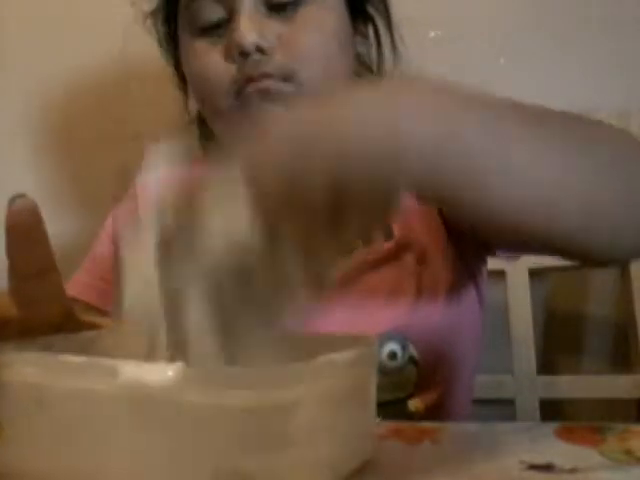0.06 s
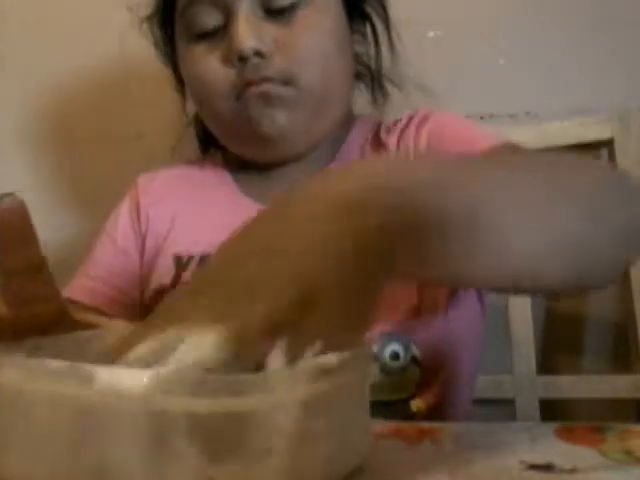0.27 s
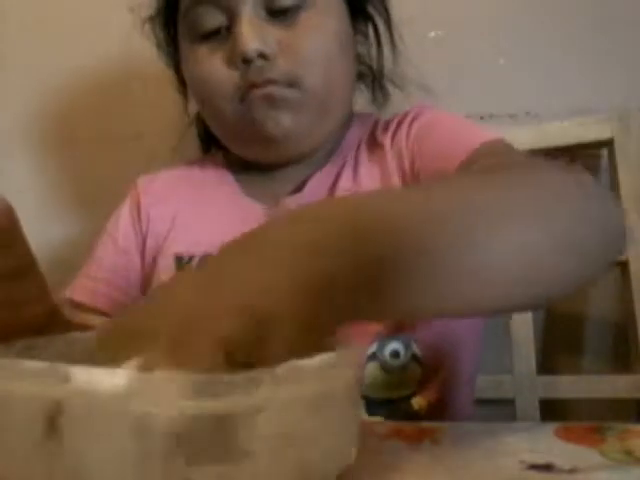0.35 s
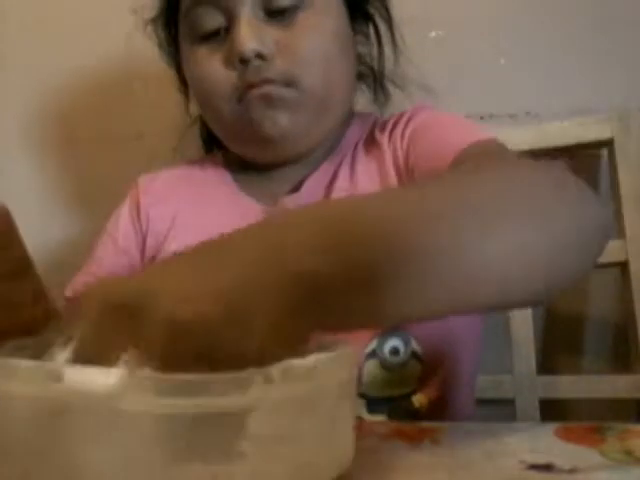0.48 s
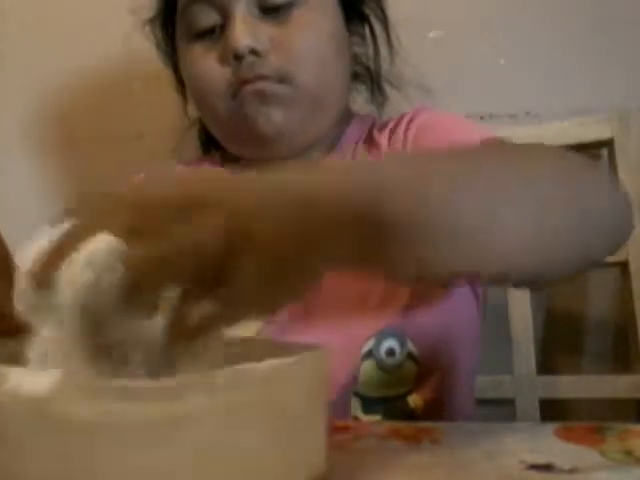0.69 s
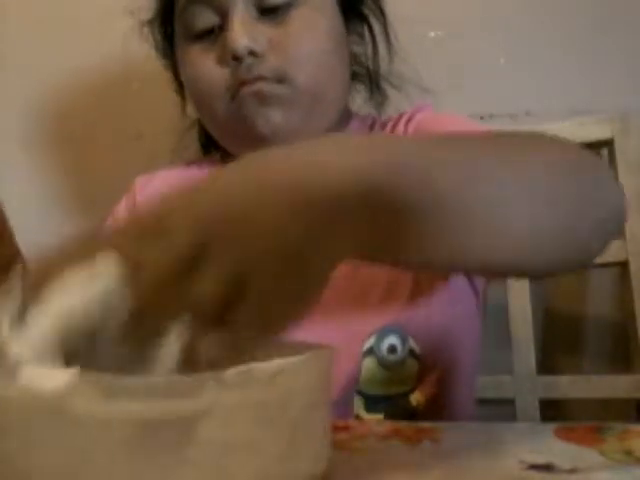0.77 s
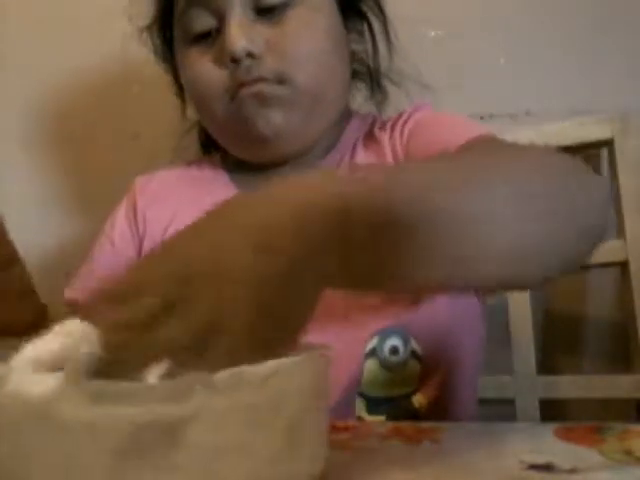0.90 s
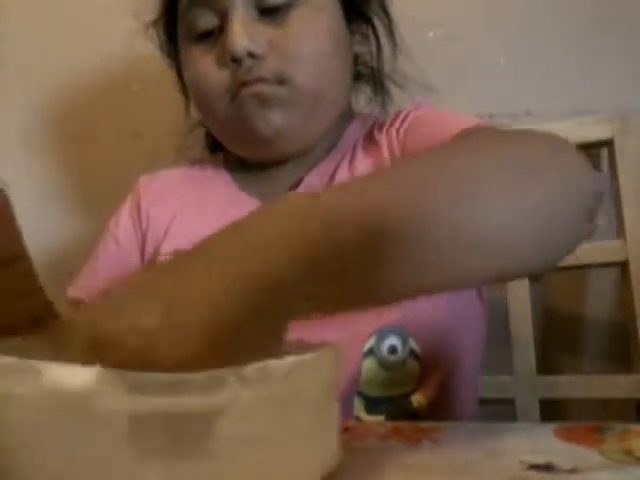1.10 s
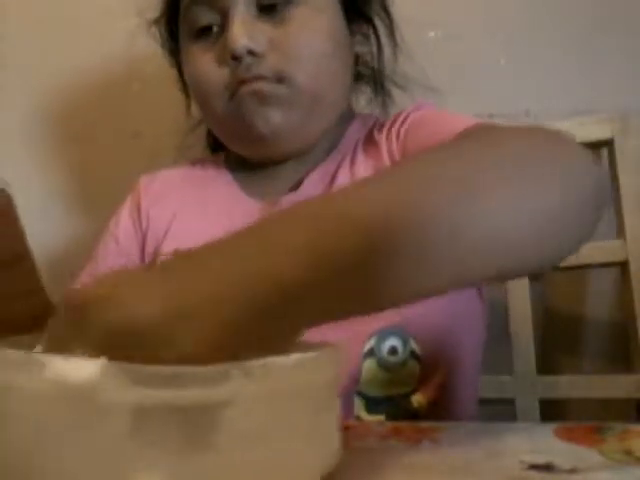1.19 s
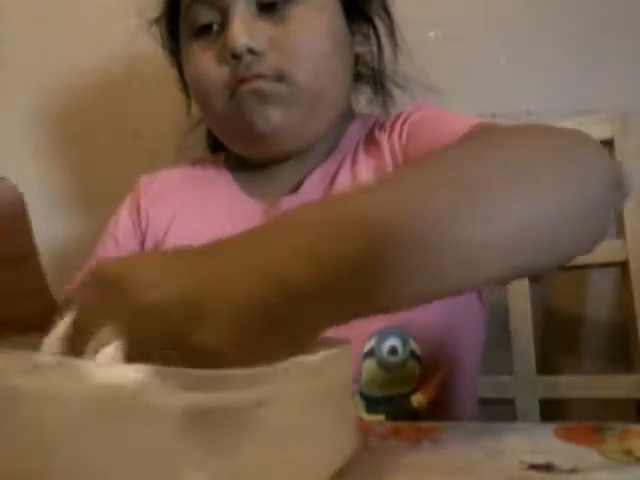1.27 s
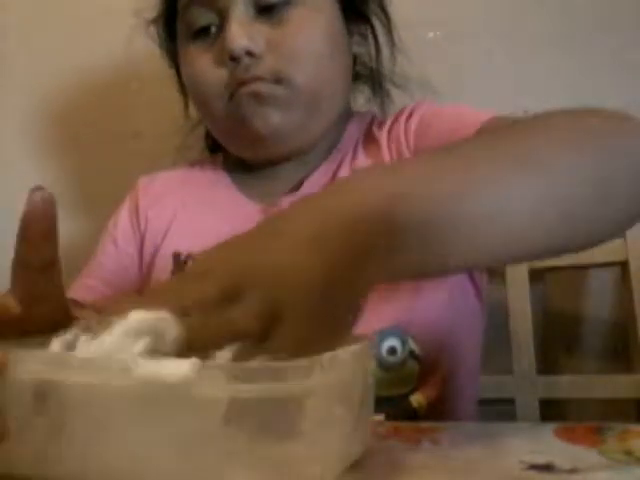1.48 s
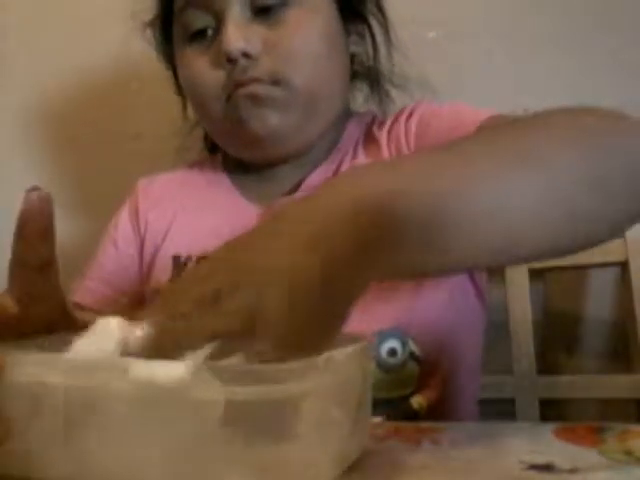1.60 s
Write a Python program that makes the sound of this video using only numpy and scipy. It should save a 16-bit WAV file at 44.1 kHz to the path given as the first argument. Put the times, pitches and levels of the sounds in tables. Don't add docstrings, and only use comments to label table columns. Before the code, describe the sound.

Glue slime is kneaded by hand in a plastic tub, close to a small microphone in a plain room. Near silence holds until faint sticky ticks at 0.1 s; soft thumps and pops come at 0.25 s. Dense wet squelches and snaps fill 0.43-0.7 s, then quieter pressing. The sharpest wet pops hit at 1.08 and 1.19 s, the latter with a tub knock. After 1.3 s it nearly stops, with small pops and ticks around 1.5-1.6 s.

```python
import sys
import numpy as np
from scipy import signal
from scipy.io import wavfile

SR = 44100
rng = np.random.default_rng(int(sys.argv[2]) if len(sys.argv) > 2 else 0)


def magnitude_from_level(level_db):
    exponent = np.asarray(level_db, float) / 20
    return 10 ** exponent


def materialize(psi):
    bounded = np.clip(np.atleast_2d(psi).T, -1, 1)
    quanta = np.round(bounded * 32767).astype(np.int16)
    wavfile.write(sys.argv[1], SR, quanta)


N = 72765

# start in seconds, effort as
# background let through in dB, tearing in dB, squeezing in dB, load on the tub in dB.
HAND_STROKES = [
    (0, -91.5, 1, -1, 6.5),
    (0.072, -101, -12, -8, -18),
    (0.107, -85.5, 1, -21, 1),
    (0.153, -79.5, 14, -13, 6),
    (0.158, -67, 21.5, -7, -2),
    (0.208, -67, 3, -30, 0),
    (0.248, -64.5, 15, 4.5, 8),
    (0.333, -64, -3.5, -8, 7),
    (0.343, -60, 17.5, -8, 3),
                (.43, -58, 9, 0, -1),
    (0.491, -63, 11, 9.5, 4.5),
    (0.562, -53.5, -5, -4.5, 0),
    (0.634, -58.5, 2, 8, 1.5),
    (0.661, -63.5, 2, 6.5, -10),
    (0.676, -55.5, -18, -22, -1),
    (.72, -63, -15, -25, 6),
    (.745, -68, -23, 10, 5),
    (0.79, -77.5, -21, -7, -13),
                (0.797, -68, 12, -10, 6),
    (.88, -64.5, -1, -18, 4.5),
    (.94, -69, 8, -23, -5),
    (0.963, -61, -14, 1.5, 1),
    (1.026, -73, 4, -4, 2.5),
    (1.059, -51.5, -6, -26, -3.5),
    (1.138, -59.5, -7, -13, -8),
    (1.187, -60, 6, 0.5, 8),
    (1.193, -42.5, -9, 1.5, -8),
                (1.29, -61.5, -17, -21, 0),
    (1.357, -77.5, -40, -34, 0.0039),
    (1.395, -74, 5, -27, 0),
    (1.449, -78.5, 0, -2, 0.016),
    (1.482, -85, -11, 0, 0),
    (1.493, -75.5, 9, 18.5, 0.0043),
    (1.531, -71, 6, -3, 0),
    (1.547, -90, -20, -10, 0),
    (1.562, -65.5, 13, 10.5, 0),
                (1.085, -49.5, -5, -21, -9),
    (1.11, -61, 8, -25, -3),
    (1.159, -60.5, 5, 12, 1.5),
    (1.214, -50.5, 3, -3.5, -10.5),
    (1.256, -55, -1, -3, -5),
    (1.295, -66.5, -9, -21, 2),
    (1.597, -69, -5, 1, -19),
    (1.603, -63, 7, -23, -9),
    (1.63, -73, 12, -13, 1),
]
END_S, END_EFFORT_DB = 1.641, -80

# centre in seconds, half length in seconds, depth in dB.
DROPOUTS = [
    (.027, 0.0022, -24),
    (0.071, 0.0075, -13),
    (0.66, 0.0037, -13.5),
    (0.785, 0.0034, -7.5),
    (1.445, 0.0078, -15),
    (1.479, 0.0013, -12),
]
# frequency in Hz, level in dB per Hz.
BACKGROUND_TONE = [(40, -25.5), (300, 0.5), (1900, -10.5), (2700, -12), (3800, -14), (5300, -10),
                   (8500, -22), (15000, -24.5)]
# time of peak in seconds, peak in dB,
# pitch in Hz.
FILM_TICKS = [(0.1086, -54, 5550), (0.116, -55.5, 5100), (0.1564, -41, 5540), (0.162, -50, 4170),
              (0.2434, -49, 5340), (0.2535, -43, 4900), (0.3437, -38, 5600), (0.4635, -39, 4840),
              (0.5168, -40.5, 5950), (0.5417, -37.5, 5400), (0.5533, -28, 4860), (0.5811, -37.5, 7450),
              (0.6303, -44.5, 5800), (0.6835, -45, 4770), (0.7081, -38.5, 4870), (0.7931, -45, 5600),
              (0.8133, -47.5, 5300), (0.8335, -47.5, 4840), (0.8792, -32, 5570), (0.8887, -48, 5360),
              (1.0825, -28.5, 6180), (1.1646, -46, 4740), (1.1734, -35.5, 4800), (1.1928, -24, 6570),
              (1.2025, -38, 6430), (1.2174, -43, 6500), (1.612, -48.5, 3550), (1.5633, -41, 6020),
              (1.5735, -51, 6850), (1.5992, -36.5, 5400),
              (.1192, -63, 5340), (0.2187, -47, 4970), (.446, -43.5, 7600), (0.5127, -41.5, 7660),
                (0.5934, -44, 6040), (1.0612, -39, 5640), (0.871, -63, 5500), (.901, -58, 5400),
                (.943, -52, 5350), (.956, -51.5, 5460), (1.165, -40, 7700), (1.184, -46, 5100),
                (1.589, -53, 5800)]
# time of peak in seconds, peak in dB.
TICK_SPARKS = [(.1557, -77), (.218, -71), (0.254, -62), (.5124, -58), (0.5167, -56), (0.5415, -56),
               (.5523, -58), (.559, -62), (.5743, -53), (.5943, -60), (0.6294, -59), (.7075, -58),
               (.8895, -57.5), (1.0825, -73), (1.088, -69), (1.1635, -58), (1.1932, -41.5), (1.197, -52),
               (1.203, -67), (1.2385, -58), (1.563, -66), (1.5995, -80)]
# time of peak in seconds, peak in dB, pitch in Hz.
STRAND_SNAPS = [(.158, -44, 3800), (.2445, -47.5, 3020), (.2485, -50.5, 2760), (.3465, -51, 3500),
                (.448, -62, 3300), (.4835, -50, 2600), (.488, -45, 2420), (.5485, -39, 3390),
                (.57, -48.5, 2980), (.582, -44, 2700), (.708, -50, 2590), (.8795, -53, 2540),
                (.9595, -51.5, 2610), (1.0825, -39.5, 2540), (1.174, -43, 2820), (1.193, -35.5, 3530),
                (1.5635, -55.5, 3620), (1.6, -46, 3230)]
# time of peak in seconds, peak in dB, pitch in Hz.
AIR_POPS = [(0.2186, -46, 905), (0.244, -44, 1580), (0.2521, -37, 783), (0.4343, -31.5, 1735),
            (0.4601, -43, 895), (0.4827, -27, 1690), (0.4871, -24, 1570), (0.5191, -38.5, 850),
            (0.5538, -25.5, 1374), (0.5985, -32, 1430), (0.6036, -36.5, 1420), (0.6353, -41.5, 1690),
            (0.6738, -33, 1530), (0.6837, -34.5, 1310), (0.8233, -43.5, 1770), (0.8783, -41.5, 1380),
            (0.8904, -43.5, 925), (0.9588, -45, 1600), (0.9629, -43.5, 1370), (1.0826, -21, 1530),
            (1.0997, -33, 1035), (1.1742, -33.5, 1900), (1.1946, -33.5, 730), (1.1981, -25.5, 1264),
            (1.2868, -45, 1920), (1.5222, -41.5, 1590), (1.5265, -48, 950), (1.5644, -44.5, 1740),
            (1.6, -41.5, 1500), (1.619, -60, 1160), (0.4647, -42, 1320), (0.4476, -43, 2080),
            (.4585, -41, 1540), (.4335, -37.5, 760), (0.6058, -45, 1150), (0.62, -55, 1300),
            (.648, -56, 1100), (.888, -44, 1830), (0.955, -47.5, 1630), (1.0605, -40, 1800),
            (1.069, -51, 1370), (1.126, -39, 2030), (1.2043, -31, 1800), (1.272, -40.5, 1760),
            (1.336, -52, 1630), (1.5735, -50, 1240), (1.582, -50, 1490), (1.491, -56, 880)]
# start in seconds, peak in dB, pitch in Hz, 60 dB decay in seconds.
TUB_THUMPS = [
    (0.227, -23.5, 208, 0.0068),
    (0.2466, -26, 164, 0.029),
    (0.256, -34, 50.5, 0.16),
    (0.816, -40, 88, 0.071),
    (0.918, -46, 79, 0.11),
    (0.971, -38, 61.6, 0.08),
    (1.19, -37.5, 260, 0.063),
    (1.191, -26.5, 582, 0.049),
]
# time of peak in seconds, peak in dB, pitch in Hz.
AIR_GURGLES = [(.666, -43, 1525),
                                                                                                                                       (.687, -43.5, 1370),
                                                                                                                                       (1.5225, -51, 4820),
                                                                                                                                       (.8135, -49, 1780),
                                                                                                                                       (1.088, -36.5, 1900)]

BACKGROUND_DB, PATCHY_DB, TOGETHER = 11, 3.5, 0.29
BASS_FOLLOWS, TOP_FOLLOWS = 0.51, 0.65
RUMBLE_DB, RUMBLE_FOLLOWS, RUMBLE_HZ = -55, 0.81, (49.7, 132.7)
WALL_DB, WALL_HZ, WALL_T60_S = -53.5, 233.6, 0.068
TEAR_DB, TEAR_PER_S, TEAR_HZ = -4.5, 5000, (4480, 6130)
SQUEEZE_DB, SQUEEZE_PER_S, SQUEEZE_HZ = 2, 1100, (450, 2300)
SPARK_HZ = 10730
HOLLOW_DB, HOLLOW_RATIO = -19, 0.37
THUMP_RISE_CYCLES = 0.4
ROOM_DB, ROOM_T60_S, WALL_CUT_HZ = -17.5, 0.14, 7300
MIC_CUTOFF_HZ = 15800


def rms_one(x):
    return x / np.sqrt(np.mean(x ** 2) + 1e-20)


def drift(rate_hz):
    r = np.exp(-80 * np.pi * rate_hz / SR)
    white = rng.standard_normal(N // 40 + 2002)
    slow = signal.lfilter([1], [1, -2 * r, r * r], white)[2000:]
    return np.interp(np.arange(N) / 40, np.arange(len(slow)), rms_one(slow))


def ring(clicks, hz, t60_s):
    r, w = magnitude_from_level(-60 / (t60_s * SR)), 2 * np.pi * hz / SR
    return signal.lfilter([0, np.sin(w)], [1, -2 * r * np.cos(w), r * r], clicks + 1e-18)


def band(x, low_hz, high_hz):
    return signal.sosfilt(signal.butter(2, [low_hz, high_hz], "band", fs=SR, output="sos"), x)


def band_noise(noise, span_hz):
    return rms_one(band(band(noise, *span_hz), *span_hz))


def bursts(rows, rise_cycles, fall_cycles, glide, crack_db, crack_hz):
    before = 200
    out, t = np.zeros(N + 1200), np.arange(-before, 600) / SR
    noise = rng.standard_normal((60, len(t)))
    cracks = band_noise(noise, crack_hz)
    for (s, db, hz), crack, phase in zip(rows, cracks, noise[:, 0]):
        cycles = t * hz
        swell = np.exp(-(cycles / rise_cycles) ** 2)
        decay = 1 / np.cosh(cycles / fall_cycles)
        shape = np.where(cycles < 0, swell, decay)
        tone = np.cos(2 * np.pi * (cycles + glide * cycles * cycles / 2) + phase)
        i = int(s * SR)
        out[i:i + len(t)] += magnitude_from_level(db) * shape * (tone + magnitude_from_level(crack_db) * crack)
    return out[before:N + before]


def grains(per_s, span_hz, cycles, spread_db, clump_db):
    sizes = magnitude_from_level(spread_db * np.minimum(rng.exponential(1, N), 4))
    signed = sizes * rng.choice([-1, 1], N)
    born = rng.random(N) < per_s * magnitude_from_level(clump_db * drift(25)) / SR
    dealt = rng.integers(0, 14, N)
    pitches = np.geomspace(*span_hz, num=14)
    out = np.zeros(N)
    for k, hz in enumerate(pitches):
        t60_s = cycles / hz
        clicks = signed * born * (dealt == k)
        out += ring(ring(clicks, hz, t60_s), hz, t60_s) * (hz / pitches[0]) ** 0.8
    return rms_one(out)


def hand():
    strokes = HAND_STROKES
    s, *columns = np.transpose(sorted(strokes + [(END_S, END_EFFORT_DB, 0, 0, 0)]))
    return [np.interp(np.arange(N) / SR, s, column) for column in columns]


def background(effort_db):
    out, together = 0, drift(40)
    edges = 36 * 2 ** np.arange(0, 9.1, 0.5)
    white = rng.standard_normal((2, N))
    hz, db = np.transpose(BACKGROUND_TONE)
    for k, (low, high) in enumerate(zip(edges, edges[1:])):
        level_db = np.interp(np.log(low * high) / 2, np.log(hz), db)
        follows = np.interp(np.log(low), np.log([150, 1500, 6000, 9000]), [BASS_FOLLOWS, 1, 1, TOP_FOLLOWS])
        flicker_db = PATCHY_DB * (TOGETHER * together + 0.5 * drift(34))
        gain_db = level_db + follows * (effort_db + 68) - 72 + flicker_db
        out = out + magnitude_from_level(gain_db) * band(white[k % 2], low, high)
    return magnitude_from_level(BACKGROUND_DB) * 4.59 * out


def tub_under_load(effort_db, load_db):
    white = rng.standard_normal((2, N))
    rumble = magnitude_from_level(RUMBLE_DB + 1.5 * drift(12)) * band_noise(white[0], RUMBLE_HZ)
    wall = magnitude_from_level(WALL_DB + 1.5 * drift(12)) * rms_one(ring(white[1], WALL_HZ, WALL_T60_S))
    return magnitude_from_level(RUMBLE_FOLLOWS * (effort_db + 53.5) + load_db) * (rumble + wall)


def tearing_fizz(effort_db, tear_db):
    films = grains(TEAR_PER_S, TEAR_HZ, cycles=9, spread_db=2.5, clump_db=2.5)
    return magnitude_from_level(effort_db + tear_db + TEAR_DB) * films


def squelch(effort_db, squeeze_db):
    bubbles = grains(SQUEEZE_PER_S, SQUEEZE_HZ, cycles=12, spread_db=4, clump_db=3.5)
    return magnitude_from_level(effort_db + squeeze_db + SQUEEZE_DB) * bubbles


def suppressor_gate():
    t = np.arange(N) / SR
    return magnitude_from_level(sum(db * np.exp(-((t - s) / half_s) ** 4) for s, half_s, db in DROPOUTS))


def film_ticks():
    return bursts(FILM_TICKS, 0.56, 5.84, 0, crack_db=-6, crack_hz=(4000, 7500))


def tick_sparks():
    rows = [(s, db, SPARK_HZ) for s, db in TICK_SPARKS]
    return bursts(rows, 5.9, 2.7, 0, crack_db=5, crack_hz=(8000, 15500))


def strand_snaps():
    return bursts(STRAND_SNAPS, 1.1, 4.3, 0, crack_db=-8.5, crack_hz=(2200, 4200))


def air_pops():
    return bursts(AIR_POPS, 1.15, 1.35, 0.056, crack_db=-8.5, crack_hz=(500, 2300))


def hollow_puffs():
    rows = [(s, db + HOLLOW_DB, hz * HOLLOW_RATIO) for s, db, hz in AIR_POPS]
    return bursts(rows, 0.23, 0.27, 0, crack_db=-2, crack_hz=(300, 900))


def tub_thumps():
    out, t = np.zeros(N), np.arange(N) / SR
    for s, db, hz, t60_s in TUB_THUMPS:
        age = np.maximum(t - s, 0)
        rise = 1 - np.exp(-age * hz / THUMP_RISE_CYCLES)
        out += magnitude_from_level(db - 60 * age / t60_s) * rise * np.sin(2 * np.pi * hz * age)
    return out


def air_gurgles():
    return bursts(AIR_GURGLES, 3.1, 7, -0.0086, crack_db=-5, crack_hz=(1000, 2400))


def room(x):
    out, dull = np.zeros(N), np.exp(-2 * np.pi * WALL_CUT_HZ / SR)
    lags = (rng.uniform(0.004, 0.02, 8) * SR).astype(int)
    for k, lag in enumerate(lags):
        loop, state = x.copy(), [0.0]
        gain = magnitude_from_level(-60 * lag / SR / ROOM_T60_S)
        for i in range(lag, N, lag):
            back, state = signal.lfilter([gain * (1 - dull)], [1, -dull], loop[i - lag:i], zi=state)
            loop[i:i + lag] += back[:N - i]
        out += (loop - x) * (-1) ** k
    return magnitude_from_level(ROOM_DB) * out


def scene():
    effort_db, tear_db, squeeze_db, load_db = hand()
    hits = air_pops() + air_gurgles() + hollow_puffs() + film_ticks() + strand_snaps()
    slime = tearing_fizz(effort_db, tear_db) + squelch(effort_db, squeeze_db)
    sparks = tick_sparks()
    tub = tub_thumps() + tub_under_load(effort_db, load_db)
    air = background(effort_db)
    return (hits + room(hits) + sparks + suppressor_gate() * (slime + tub + air))[None]


def low_pass(x):
    return signal.sosfilt(signal.butter(12, 16330, fs=SR, output="sos"), x)


def record(dry):
    x = signal.sosfilt(signal.butter(8, 40, "high", fs=SR, output="sos"), dry)
    x = signal.sosfilt(signal.cheby2(12, 50, MIC_CUTOFF_HZ + 500, fs=SR, output="sos"), x)
    return low_pass(x)


dry = scene()
out = record(dry)
materialize(out)
```